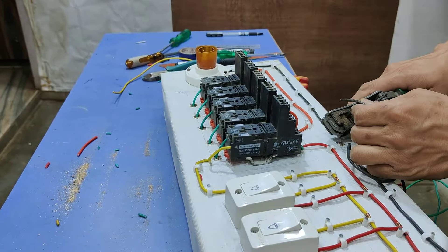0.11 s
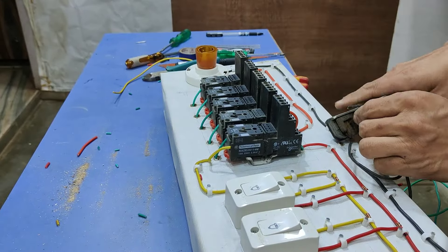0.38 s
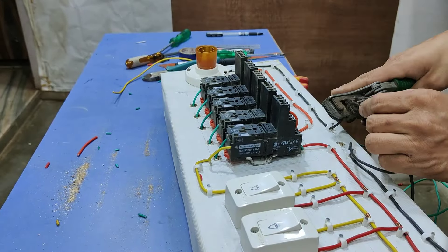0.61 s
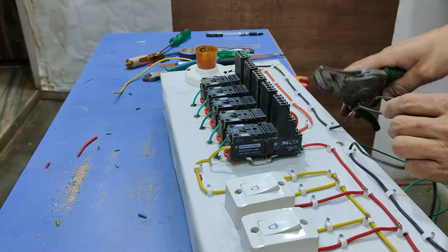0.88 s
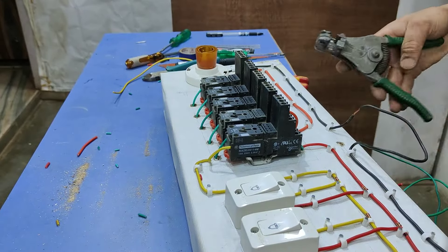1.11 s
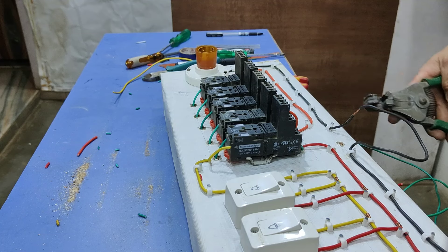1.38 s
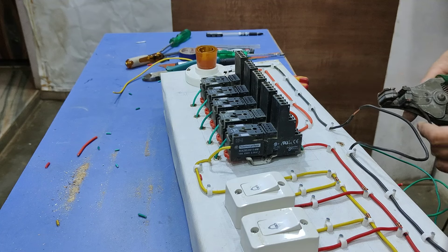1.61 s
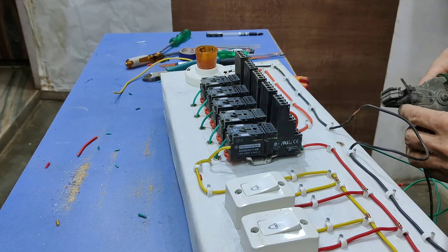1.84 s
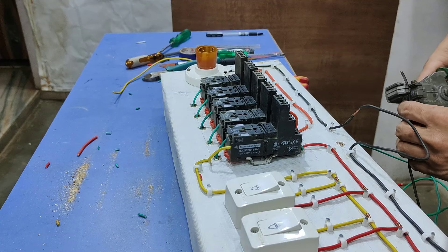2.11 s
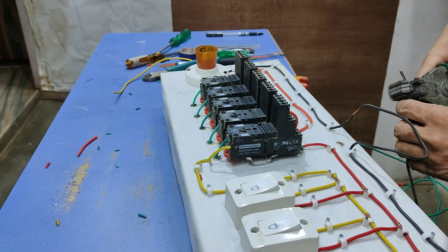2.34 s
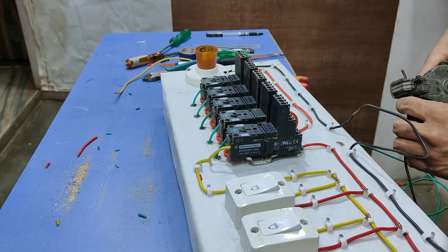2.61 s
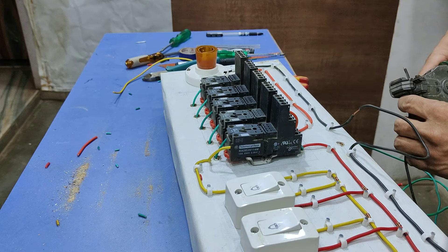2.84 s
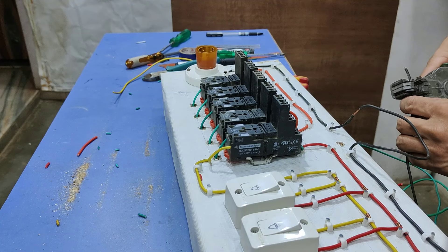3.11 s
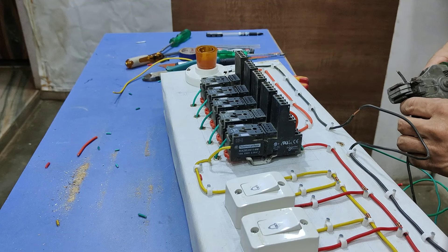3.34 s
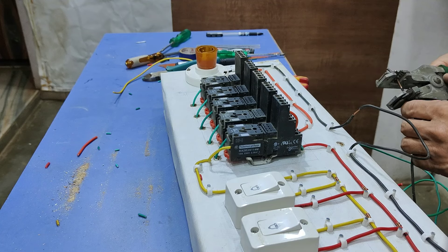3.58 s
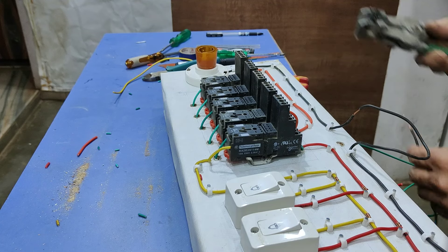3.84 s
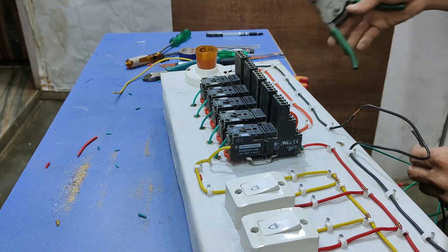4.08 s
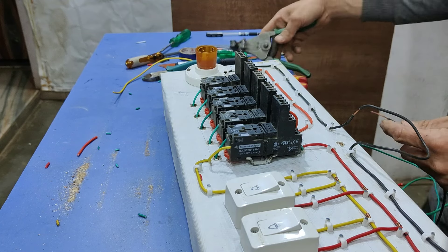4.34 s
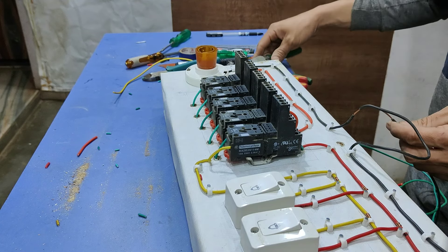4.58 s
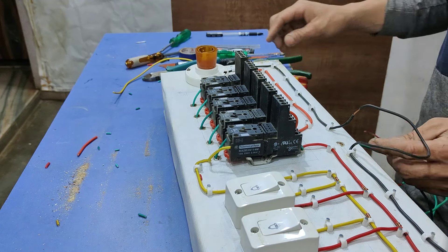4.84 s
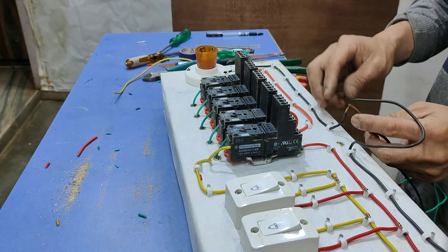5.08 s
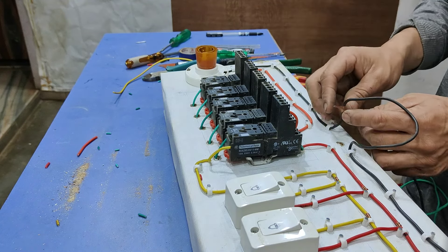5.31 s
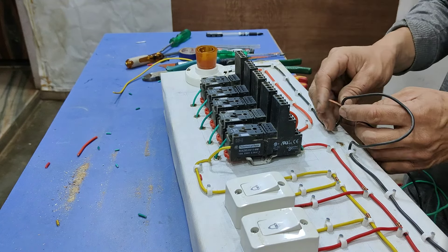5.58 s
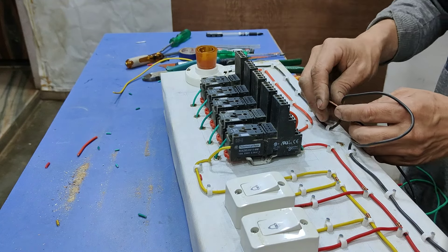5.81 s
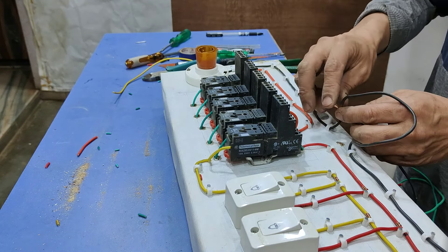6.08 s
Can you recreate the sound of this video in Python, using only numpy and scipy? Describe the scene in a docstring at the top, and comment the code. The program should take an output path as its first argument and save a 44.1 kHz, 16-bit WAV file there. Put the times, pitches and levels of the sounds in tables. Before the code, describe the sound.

Close stereo pickup at a wooden workbench: quiet rumbling room tone, a few tiny metallic ticks and dull knocks, then a long pause. Spring-loaded jaws chatter and crack open sharply with a low push of air. A soft scuff and small knocks lead to a very loud wooden clatter as the tool is set down, its bounces dying quickly into short reflections, leaving faint bumps and room hum.

```python
"""In a small hard-walled workshop the room rumbles, hums and washes softly throughout, as filtered noise.
A hand works a spring-loaded wire stripper beside a wooden bench: its jaws tick, with soft knocks on the wood,
as bursts of noise ring the modes of steel and wood. Near four seconds the jaws snap open with a crack and a
push of air, and a faint note follows. Then the tool is laid on the bench, where it lands and bounces."""
import sys
import numpy as np
from scipy import signal
from scipy.fft import rfft, irfft, next_fast_len
from scipy.io import wavfile
from scipy.ndimage import uniform_filter1d

SR = 44100
rng = np.random.default_rng(int(sys.argv[2]) if len(sys.argv) > 2 else 0)


def gain_from_db(level_db):
    """Convert decibel levels to linear amplitude factors (20 dB per decade)."""
    decades = np.asarray(level_db, float) / 20
    return 10 ** decades


def wav_record(signal):
    """Record a signal, one row per channel, as 16-bit PCM in the file named by sys.argv[1]."""
    frames = np.transpose(np.atleast_2d(signal))
    bounded = np.clip(frames, -1, 1)
    # unit amplitude maps onto the largest positive 16-bit level
    quanta = np.round(bounded * 32767).astype(np.int16)
    wavfile.write(sys.argv[1], SR, quanta)


N = 272979


def rms_one(x):
    """Scale to rms 1."""
    return x / np.sqrt(np.mean(x ** 2) + 1e-20)


def at_hz(points, hz):
    """Read a table of (Hz, value) on a log-frequency axis."""
    table_hz, values = np.transpose(points)
    return np.interp(np.log(hz), np.log(table_hz), values)


def coloured(x, gain_db):
    """Filter by a gain that is a function of frequency."""
    size = next_fast_len(N + SR // 10)
    gain = gain_from_db(gain_db(np.fft.rfftfreq(size, 1 / SR) + 1))
    return irfft(rfft(x, size) * gain, size)[:, :N]


def drift(rate_hz):
    """Slow random wander of rms 1: noise smoothed twice, computed at every 40th sample."""
    r = np.exp(-80 * np.pi * rate_hz / SR)
    slow = signal.lfilter([1], [1, -2 * r, r * r], rng.standard_normal(N // 40 + 2002))
    slow = slow[2000:]   # skip the filter's start
    return np.interp(np.arange(N) / 40, np.arange(len(slow)), rms_one(slow))


def ring(force, hz, t60):
    """A unit click sets a sine of about height 1 ringing, for a t60 of at least 3 ms."""
    r = gain_from_db(-60 / (max(t60, .003) * SR))
    w = 2 * np.pi * hz / SR
    return signal.lfilter([0, np.sin(w)], [1, -2 * r * np.cos(w), r * r], force + 1e-18)


def peak(x, hz, width_hz):
    """Resonance whose gain on top is about 1."""
    r = np.exp(-np.pi * width_hz / SR)
    top = np.array([1, 0, -1]) * (1 - r * r) / 2
    return signal.lfilter(top, [1, -2 * r * np.cos(2 * np.pi * hz / SR), r * r], x)


def stereo_pair(mid, side, alike):
    """Mix two unrelated signals to left and right; alike runs from 0 (unrelated) to 1 (the same)."""
    return np.sqrt(1 + alike) * mid + np.sqrt(1 - alike) * side


def stereo_bands(length):
    """Half-octave bands of left-right noise, most alike in the bass and least in the upper middle."""
    # Likeness of left and right. Each row: frequency in Hz, likeness from 0 to 1.
    likeness = [(60, 0.82), (180, 0.73), (550, 0.57), (1650, 0.02), (4970, 0.17), (15000, 0.59)]
    edges = 20 * 2 ** np.arange(0, 10.1, .5)
    white = rng.standard_normal((2, 2, length))   # neighbouring bands take turns with two noises
    for k, (low, high) in enumerate(zip(edges, edges[1:])):
        band = signal.butter(2, [low, high], "band", fs=SR, output="sos")
        mid, side = signal.sosfilt(band, white[k % 2])
        hz = np.sqrt(low * high)
        yield hz, stereo_pair(mid, side * [[1], [-1]], at_hz(likeness, hz))


def hums():
    """A few wavering hums: noise through two equal narrow resonances in a row."""
    # Hums of the room. Each row: pitch in Hz, width of each resonance in Hz, rms level in dB.
    hum_rows = [(44, 15, -64.5), (194.2, 5.3, -76), (1097, 69, -83.5), (2310, 55, -91.5)]
    total = np.zeros(N)
    for hz, width_hz, db in hum_rows:
        narrow = peak(peak(rng.standard_normal(N), hz, width_hz), hz, width_hz)
        total += gain_from_db(db) * rms_one(narrow)
    return total


def room_tone(patchy_db):
    """Far rumble below, a dull wash above, swelling slowly together, with hums."""
    # Colour of the far rumble. Each row: frequency in Hz, relative level in dB per Hz.
    rumble_colour = [(11, -37.5), (18, -9), (32, -0.5), (49, -0.5), (61, -6), (70, -13.5), (102, -15),
                     (130, -18), (170, -47.5), (290, -120)]
    # Colour of the dull wash. Each row: frequency in Hz, relative level in dB per Hz.
    wash_colour = [(59, -34), (100, -11), (156, -10), (197, -3.5), (248, -14.5), (306, -6.5), (386, -12),
                   (415, -13.5), (745, -17), (1080, -14.5), (1880, -26), (2930, -25), (3890, -41.5),
                   (4990, -38.5), (7000, -60.5), (9100, -96), (15400, -120)]
    # Far activity outside swells and fades. Each row: time in seconds, rumble level in dB.
    swell_points = [(0.0, -65.5), (0.3, -59), (0.86, -53.5), (1.26, -55), (1.51, -59), (2.359, -61),
                    (2.5, -57.5), (3.201, -53.5), (3.549, -59.5), (3.75, -49.5), (3.95, -46),
                    (4.996, -48.5), (5.46, -57.5), (5.7, -60.5), (6.19, -60)]
    wash_db, wash_follows = -64.5, .6   # mean level in dB, share of the swell
    patchy = sum(band * gain_from_db(patchy_db * drift(rate_hz=12)) for _, band in stereo_bands(N))
    rumble = rms_one(coloured(patchy, lambda hz: at_hz(rumble_colour, hz)))
    wash = rms_one(coloured(patchy, lambda hz: at_hz(wash_colour, hz)))
    swell_db = np.interp(np.arange(N) / SR, *np.transpose(swell_points))
    wash_swell_db = wash_db + wash_follows * (swell_db - swell_db.mean())
    return gain_from_db(swell_db) * rumble + gain_from_db(wash_swell_db) * wash + hums()


def struck(contacts, modes, below_db, above_db, low_hz, high_hz, spread_db, trim_db, rise):
    """Each contact is a rattle of force that swells, dies and drives every mode with a strength of its own.

    A mode is driven less the further it lies below or above the contact's brightness, by below_db or
    above_db per octave squared; this levels off below low_hz and above high_hz."""
    even_hz = 810   # well below this a struck body sounds alike at both microphone openings
    soft_narrowing = 0.63   # per octave under 1 kHz: a soft contact loses its treble faster
    t = np.arange(SR // 5) / SR
    out = np.zeros((2, N + SR))
    start_s, contact_db, octaves, length_s = np.transpose(contacts)
    age = t / np.clip(length_s, .0003, .03)[:, None]
    swell_and_fall = (1 - np.exp(-age / rise)) * np.exp(-age)   # rise is a share of the contact length
    above_db = above_db * (1 + soft_narrowing * np.maximum(-octaves, 0))
    starts = np.round(start_s * SR).astype(int)
    for hz, mode_db, t60 in modes:
        chance_db = spread_db * rng.standard_normal(len(starts))
        rattle = rng.standard_normal((len(starts), 2, len(t)))
        mid, side = np.moveaxis(rattle, 1, 0) * swell_and_fall
        alike = 1 / (1 + (hz / even_hz) ** 2)   # high modes radiate unevenly to left and right
        force = stereo_pair(mid, side * [[[1]], [[-1]]], alike)
        rings = peak(ring(force, hz, t60), hz, hz / 3)   # a mode radiates little far from its pitch
        energy = np.sum(rings ** 2, axis=2, keepdims=True)
        rings *= np.sqrt(t60 * SR / 28 / energy)   # about the energy of a ring of height 1
        away = np.log2(np.clip(hz, low_hz, high_hz) / 1000) - octaves
        loss_db = np.where(away < 0, below_db, above_db) * away ** 2
        level_db = contact_db - loss_db + mode_db + trim_db + chance_db
        for k, at in enumerate(starts):
            out[:, at:at + len(t)] += gain_from_db(level_db[k]) * rings[:, k]
    return out[:, :N]


def stripper():
    """Jaws and spring tick and snap, and short bright rattles ring the steel tool."""
    # Ticks. Each row: start in seconds, relative level in dB, brightness in octaves above 1 kHz,
    # rattle length in seconds.
    tick_rows = [(.407, -57, 2.1, 0.0073), (.4304, -43, 2.01, 0.0039), (.4723, -47, 1.6, 0.0072),
                 (.8774, -56.5, 1.6, 0.0027), (1.1727, -61.5, 2.3, 0.0029), (1.1842, -61, 2.6, 0.002),
                 (2.4214, -72.5, 1.6, 0.0027), (3.4186, -62, 1.2, 0.0048), (3.6167, -53.5, 1.01, 0.0052),
                 (3.6267, -47, 1.7, .0094), (3.635, -51.5, 1.5, 0.0051), (3.7628, -57, 2.1, 0.0016),
                 (3.7734, -62, 1.5, .0035), (3.801, -55, .1, 0.0019), (3.8062, -43.5, 1.9, 0.0043),
                 (3.8194, -43.5, 1.3, .01), (3.9609, -49.5, 1.4, 0.007), (3.9874, -35.5, 1.8, 0.0046),
                 (3.9975, -15, 1.98, 0.00085), (4.0064, -24, 2.9, 0.0032), (4.36, -62.5, 2.7, .008),
                 (4.478, -65.5, 3.2, .004)]
    # Modes of the steel tool. Each row: pitch in Hz, relative level in dB, t60 in seconds, which also
    # sets the energy; no mode rings for less than 3 ms.
    steel_modes = [(332.3, 0, 0.034), (608, 5.5, 0.0033), (1143, 6.5, 0.0033), (2026, 9.5, 0.0015),
                   (2800, 3, 0.0042), (3290, -3.5, 0.0039), (4183, 0, 0.016), (4774, -2.5, 0.0052),
                   (5995, 1.5, 0.002057), (7003, -5, 0.0092), (8020, -1.5, 0.0017), (9070, -3, 0.0039),
                   (11160, 0.5, 0.0066), (13350, 6, 0.0079), (14200, 10.5, .004), (14800, -1, 0.0061),
                   (14440, -2, 0.0047)]
    return struck(tick_rows, steel_modes, below_db=3.0, above_db=5.5, low_hz=900, high_hz=13000,
                  spread_db=2.0, trim_db=2.5, rise=0.24)


def bench_knocks():
    """Knocks and slides, then the landing and bounces, ring the wooden bench."""
    # Knocks and slides. Each row: start in seconds, relative level in dB, brightness in octaves
    # above 1 kHz, contact length in seconds (held to 0.03 at most).
    knock_rows = [(.6185, -40, 0.21, 0.0054), (.801, -46.5, 0.15, 0.0079), (.849, -44.5, 0.24, 0.0077),
                  (.872, -49, -0.44, 0.002), (4.286, -50.5, 1.04, 0.0077), (4.298, -41, 0.98, 0.032),
                  (4.323, -35, -1.14, 0.0029), (4.331, -29, -0.044, 0.0028), (4.352, -36.5, -1.1, 0.0059),
                  (4.367, -34, -1.6, 0.0035), (4.5615, 4, 0.17, 0.0031), (4.58, -2.5, 0.45, .01),
                  (4.638, -4, -0.36, 0.0031), (4.656, -16.5, 0.01, 0.0042), (4.686, -3.5, -0.27, .0025),
                  (4.719, -17, 0.49, .0027), (4.75, -9, 0.058, 0.0047), (4.779, -16, -0.19, 0.0042),
                  (5.138, -37, -1.6, 0.0068), (5.16, -42, -1.55, 0.0076), (5.321, -54, -1.61, 0.0067)]
    # Modes of the wooden bench. Each row: pitch in Hz, relative level in dB, t60 in seconds.
    wood_modes = [(136, -8, 0.04), (178, -4.5, 0.084), (286.6, -3, 0.12), (386, 2.5, 0.032),
                  (445.4, -0.5, 0.065), (534, -3, 0.017), (670, 0.5, 0.022), (927, -1.5, 0.022),
                  (1080, 0.5, 0.01), (1333, 6, 0.014), (1694, 8, 0.0037), (2078, 2.5, 0.0081),
                  (2430, 5, .007), (2500, 4, 0.0084), (2730, 8.5, 0.006), (3530, -2, 0.0085),
                  (4090, 4, 0.0044), (4800, -1, 0.0069), (5200, -16.5, .004), (7000, -4, 0.0048),
                  (8900, -3.5, 0.005), (10700, -3, 0.0034), (12500, -10.5, .004), (14800, -1, .004)]
    return struck(knock_rows, wood_modes, below_db=4.5, above_db=5.5, low_hz=420, high_hz=7000,
                  spread_db=1.0, trim_db=2.3, rise=0.2)


def workshop(x):
    """Dense echoes after a short gap, dying band by band."""
    # Decay of the room. Each row: frequency in Hz, t60 in seconds.
    room_decay = [(100, 0.28), (300, 0.3), (1000, 0.39), (3500, .38), (8000, 0.43), (15000, 0.11)]
    first_echo_s = 0.0028
    early_db, early_s = 9, 0.014   # echoes from the bench and near walls stand out of the tail
    thin_hz = 446   # light walls let the bass out, so echoes are thin below this
    t = np.arange(SR * 3 // 5) / SR
    echoes = sum(band * gain_from_db(-60 * t / at_hz(room_decay, hz)) for hz, band in stereo_bands(len(t)))
    echoes = signal.lfilter(*signal.butter(1, thin_hz, "high", fs=SR), echoes)
    echoes *= np.clip(t / first_echo_s - 1, 0, 1)
    echoes *= gain_from_db(early_db * np.exp(-t / early_s))
    echoes /= np.sqrt(np.sum(echoes ** 2) / 2)
    return signal.fftconvolve(x[None], echoes, axes=1)[:, :N]


def push():
    """The snap cracks and shoves the air once; the air sloshes back and leaves a room mode ringing."""
    snap_s = 3.9985
    shove_db, fall_s = -3.2, 0.026
    click = np.zeros(N)
    click[round(snap_s * SR)] = 1
    shove = signal.lfilter([1], [1, -np.exp(-1 / (fall_s * SR))], click + 1e-18)
    shove = signal.lfilter([.03], [1, -.97], shove)   # softens its onset
    early_click = np.roll(click, -SR // 2000)   # the dry crack leads the push by half a millisecond
    crack = gain_from_db(-10) * ring(early_click, hz=1270, t60=0.0036)
    slosh = gain_from_db(-27) * ring(click, hz=19.5, t60=.4)
    room_mode = gain_from_db(-28.5) * ring(click, hz=42.8, t60=0.64)   # between the long walls
    leaning_left = gain_from_db([[1.5], [-1.5]])
    return (crack - gain_from_db(shove_db) * shove) * leaning_left - (slosh + room_mode)


def tone():
    """A soft steady note that swells and fades."""
    start_s, length_s, hz, db = 4.21, 0.14, 575, -56.5
    t = np.arange(N) / SR
    progress = np.clip((t - start_s) / length_s, 0, 1)
    envelope = np.sqrt(np.sin(np.pi * progress).clip(0))
    return gain_from_db(db) * np.sin(2 * np.pi * hz * t) * envelope


def ports(x):
    """The two microphone openings differ in colour and share a few dips."""
    # Difference in colour. Each row: frequency in Hz, left over right in dB.
    port_colour = [(60, 1.5), (150, 0.5), (380, -1), (950, 4.5), (2380, -7.5), (5980, 5), (15000, 0)]
    # Shared dips. Each row: frequency in Hz, width in Hz, depth from 0 to 1.
    shared_dips = [(6150, 820, 1), (9560, 670, .95), (12100, 170, .6), (13200, 420, 0.4)]
    x = coloured(x, lambda hz: at_hz(port_colour, hz) / 2 * [[1], [-1]])
    for hz, width_hz, depth in shared_dips:
        x = x - depth * peak(x, hz, width_hz)
    return x


def scene():
    """Tool and bench in the room, with the push and the faint note, over the room tone."""
    room_db = -2
    tool_wet_db = -1   # the tool, held in the air, excites the room less than the bench
    background = room_tone(patchy_db=1.5)
    tool = stripper()
    bench = bench_knocks()
    echoes = workshop(bench[0] + gain_from_db(tool_wet_db) * tool[0])
    return ports(tool + bench + gain_from_db(room_db) * echoes) + push() + tone() + background


def top_cut(x):
    """Nothing passes above the cut-off."""
    return signal.sosfilt(signal.butter(12, 16800, fs=SR, output="sos"), x)


def record(dry):
    """Bass cut, then gain control that ducks loud blows and lets go at a steady pace."""
    limit_db, limit_share = -6, 0.79   # this share of what exceeds the limit is taken off
    release_db_s, attack_s = 127, 0.0018   # level tracker's fall in dB per second, attack in seconds
    x = signal.sosfilt(signal.butter(2, 15, "high", fs=SR, output="sos"), dry)
    ramp_db = release_db_s * np.arange(N) / SR
    peak_db = 20 * np.log10(np.abs(x).max(axis=0) + 1e-9)
    level_db = np.maximum.accumulate(peak_db + ramp_db) - ramp_db   # jumps up, falls steadily
    duck_db = limit_share * np.maximum(level_db - limit_db, 0)
    ahead = round(attack_s * SR)
    duck_db = uniform_filter1d(np.roll(duck_db, -ahead), 2 * ahead + 1)   # ducking starts before the blow
    mix = np.clip(x * gain_from_db(-duck_db), -1, 1)
    return top_cut(mix)


dry = scene()
out = record(dry)
wav_record(out)
```